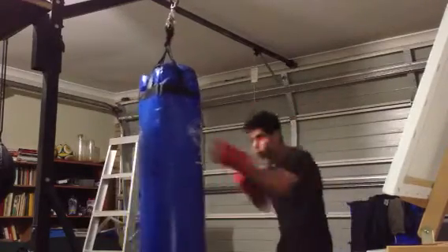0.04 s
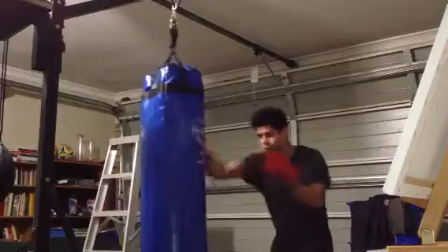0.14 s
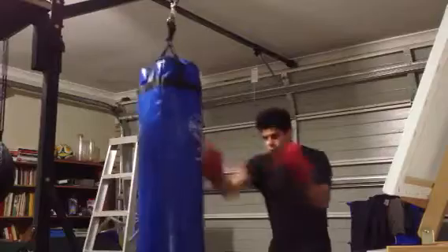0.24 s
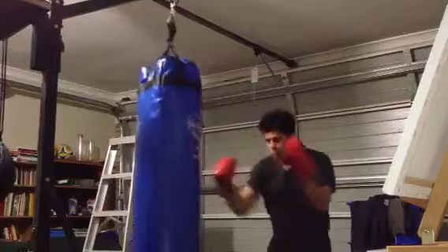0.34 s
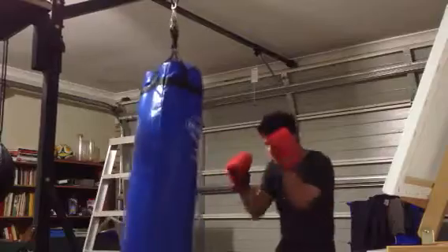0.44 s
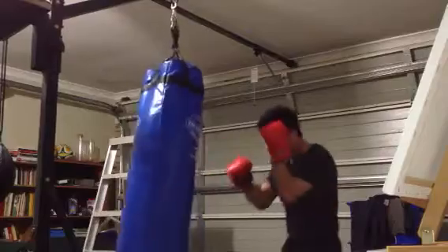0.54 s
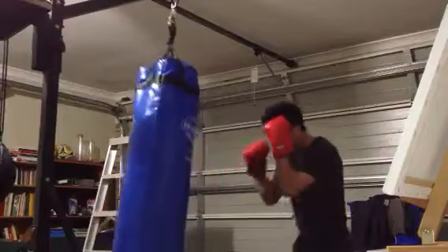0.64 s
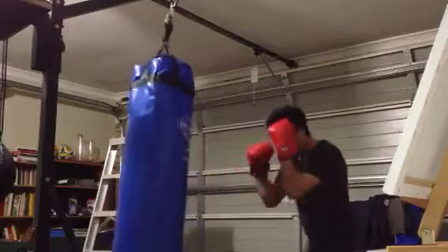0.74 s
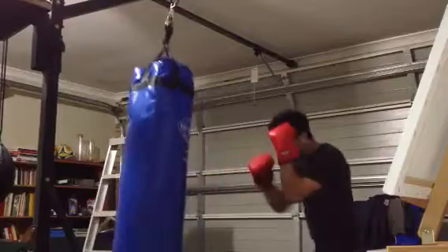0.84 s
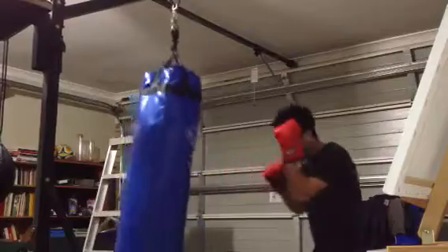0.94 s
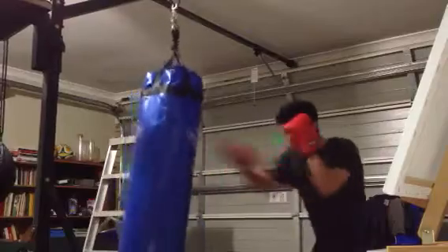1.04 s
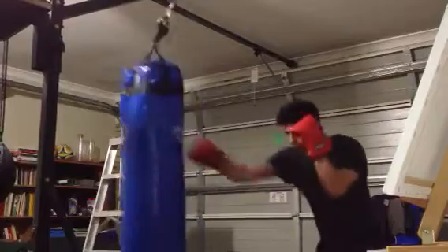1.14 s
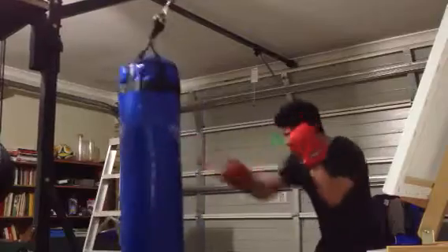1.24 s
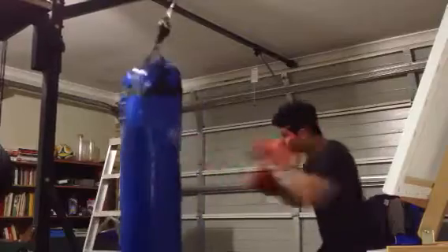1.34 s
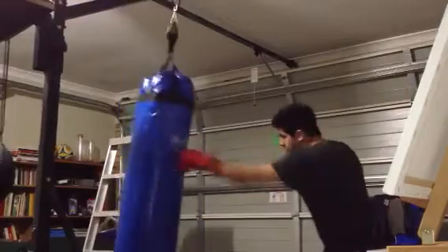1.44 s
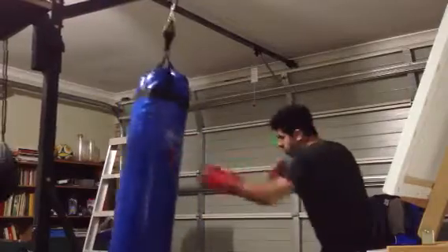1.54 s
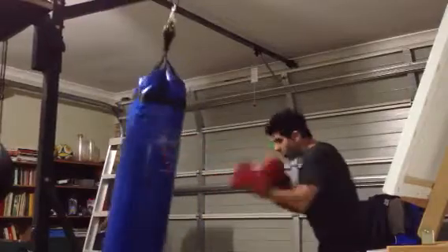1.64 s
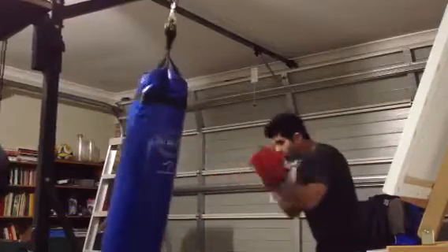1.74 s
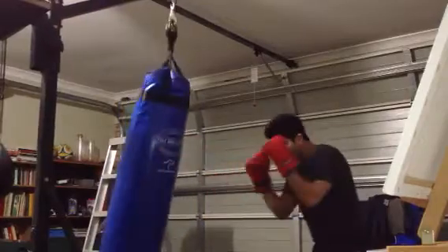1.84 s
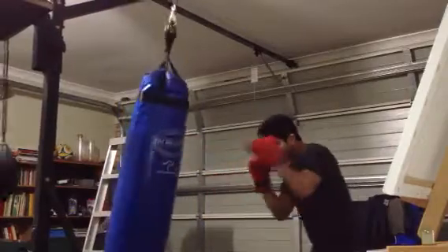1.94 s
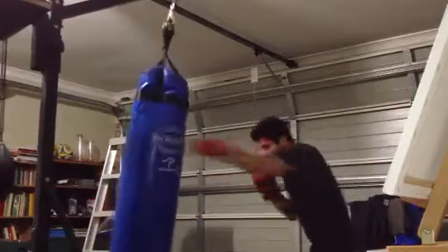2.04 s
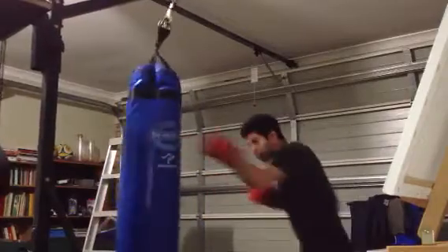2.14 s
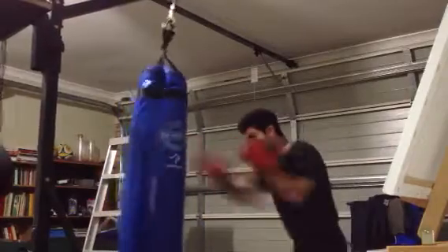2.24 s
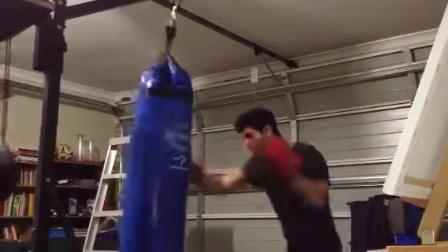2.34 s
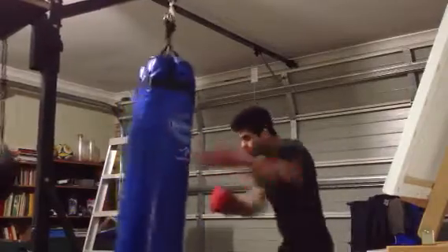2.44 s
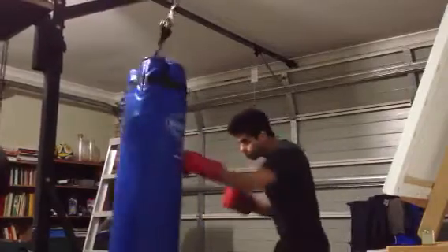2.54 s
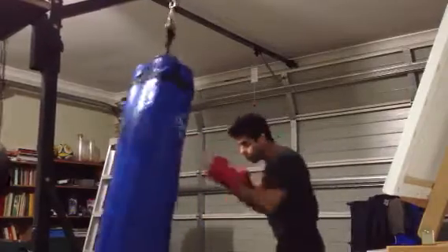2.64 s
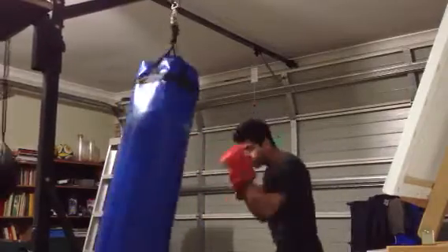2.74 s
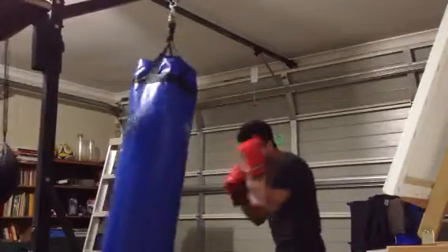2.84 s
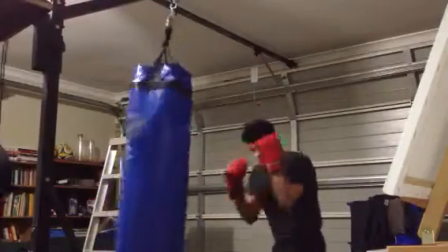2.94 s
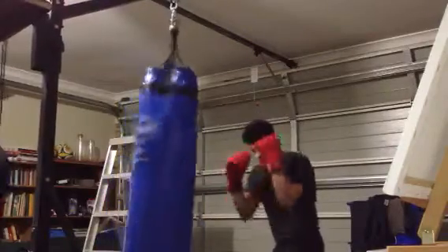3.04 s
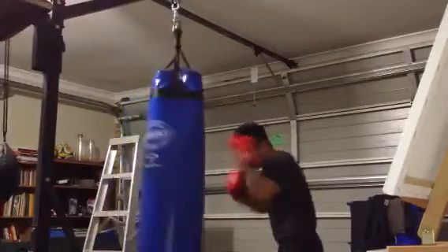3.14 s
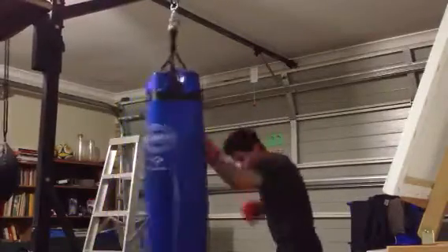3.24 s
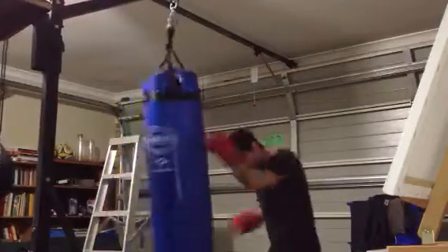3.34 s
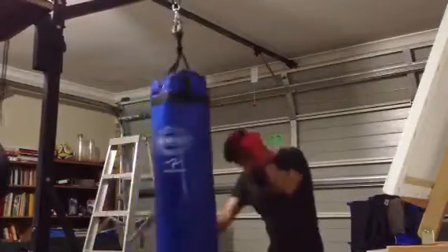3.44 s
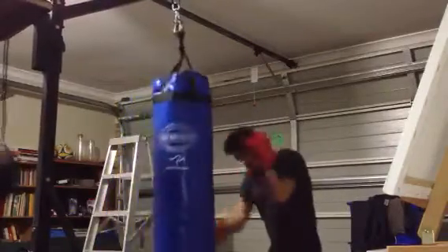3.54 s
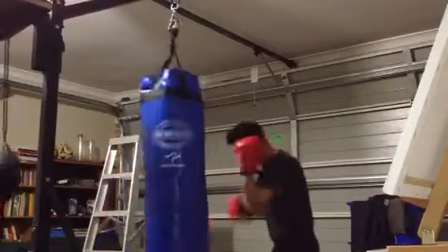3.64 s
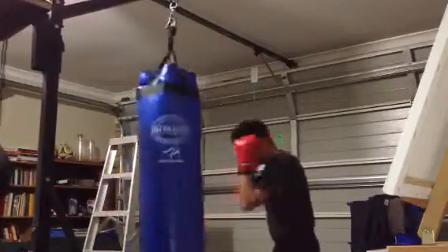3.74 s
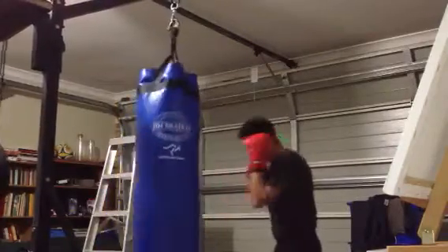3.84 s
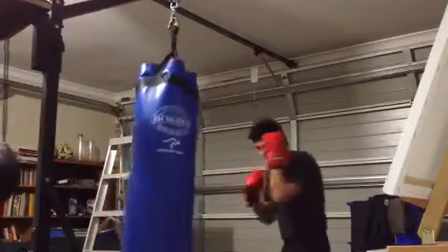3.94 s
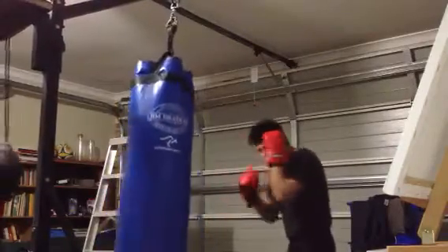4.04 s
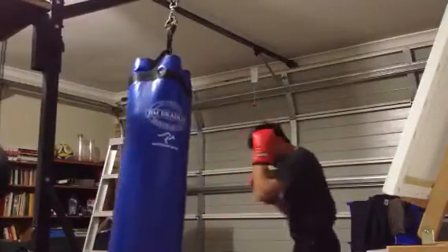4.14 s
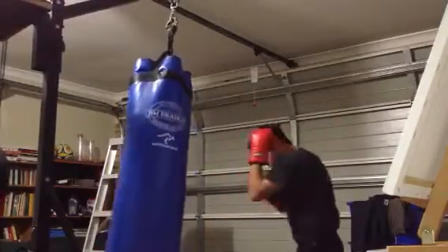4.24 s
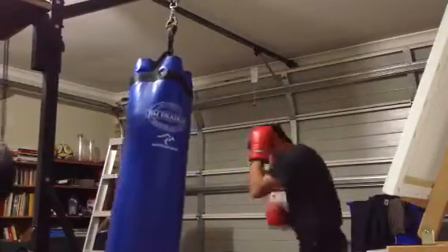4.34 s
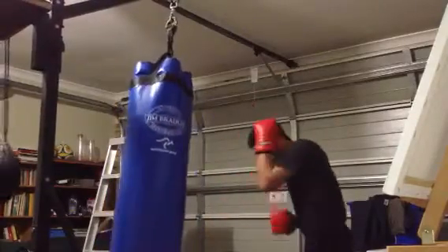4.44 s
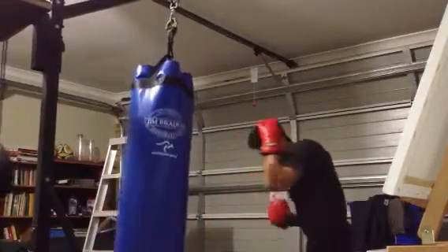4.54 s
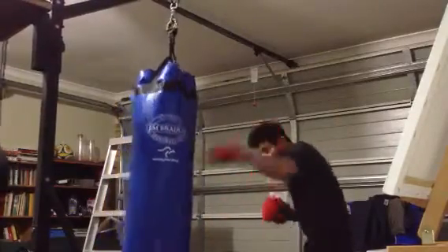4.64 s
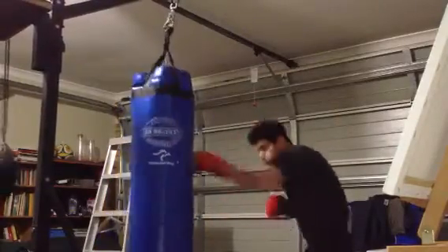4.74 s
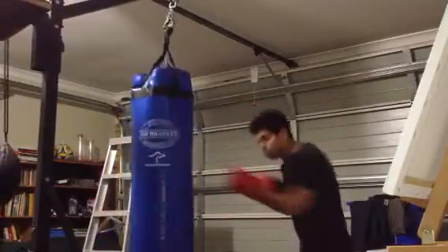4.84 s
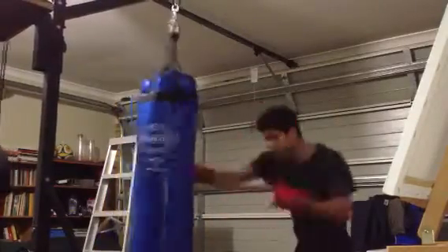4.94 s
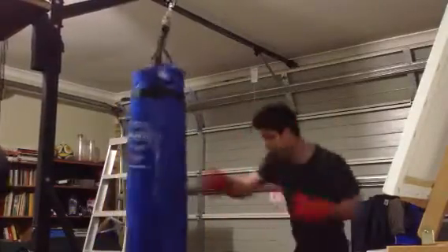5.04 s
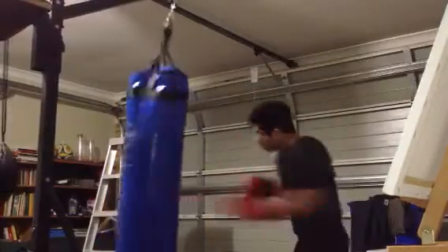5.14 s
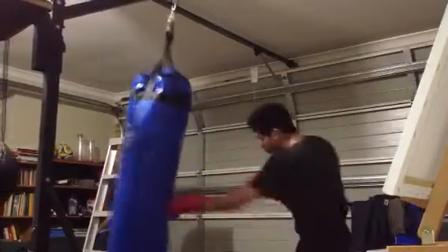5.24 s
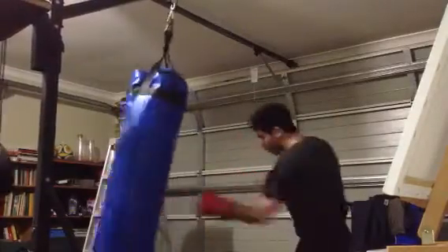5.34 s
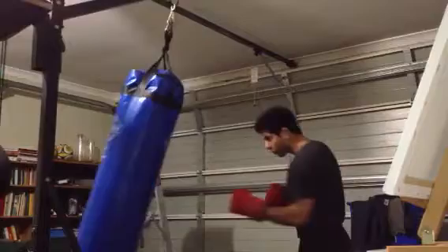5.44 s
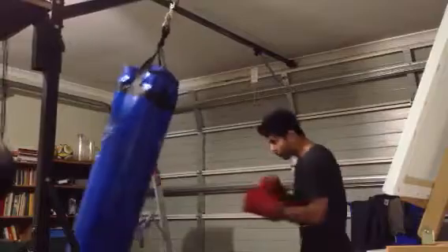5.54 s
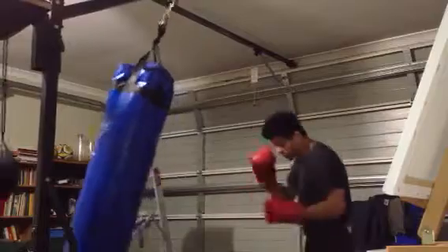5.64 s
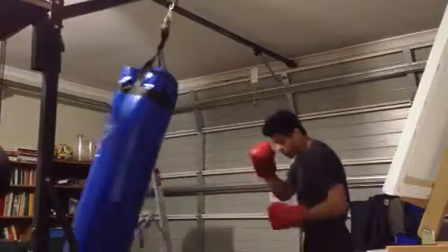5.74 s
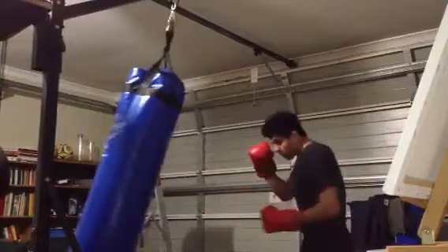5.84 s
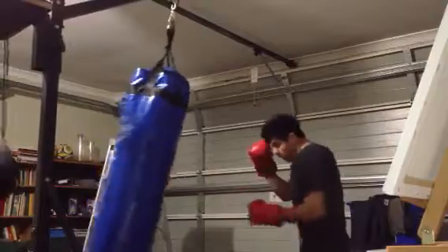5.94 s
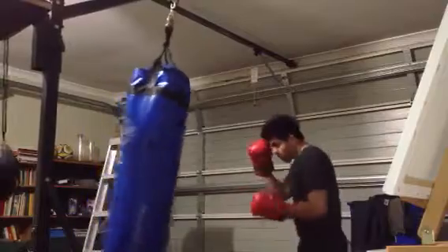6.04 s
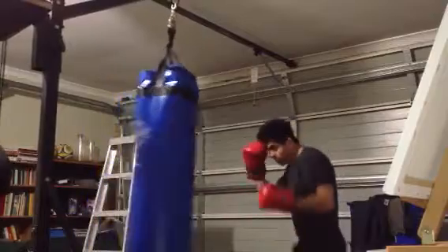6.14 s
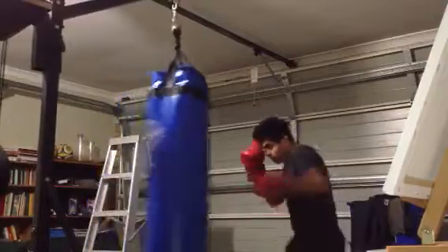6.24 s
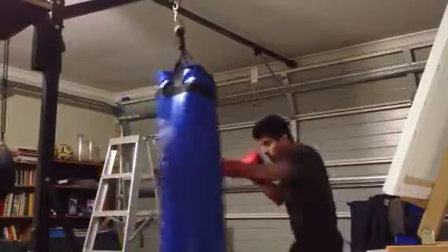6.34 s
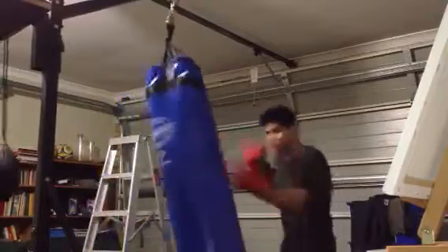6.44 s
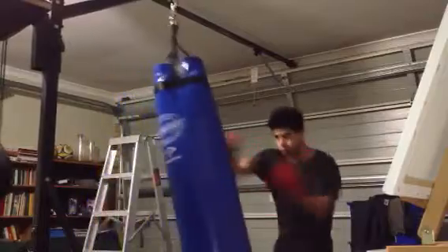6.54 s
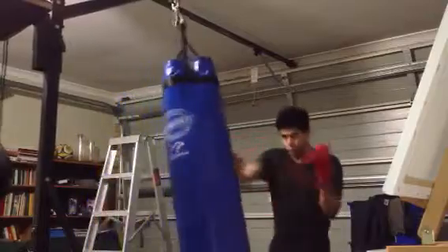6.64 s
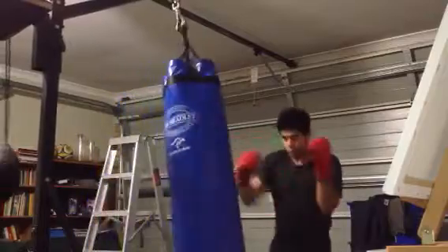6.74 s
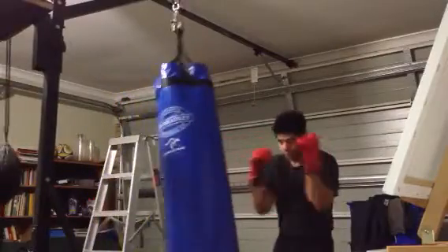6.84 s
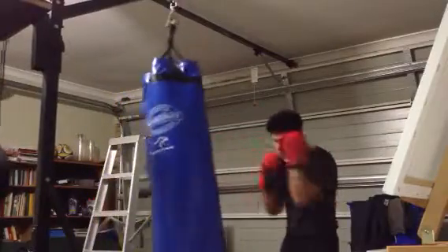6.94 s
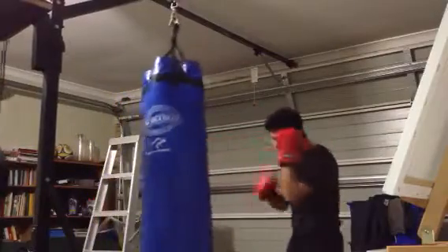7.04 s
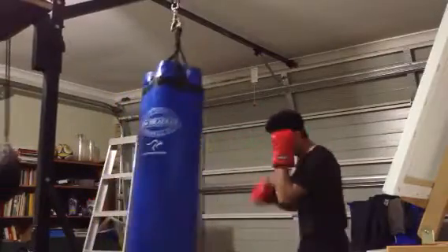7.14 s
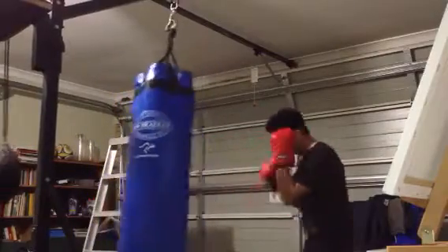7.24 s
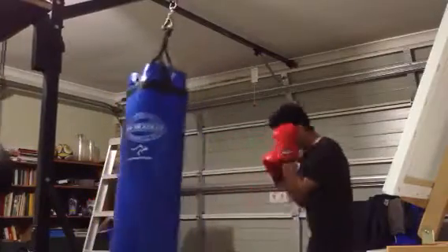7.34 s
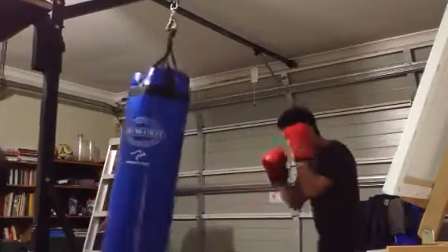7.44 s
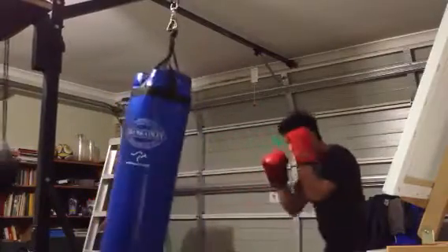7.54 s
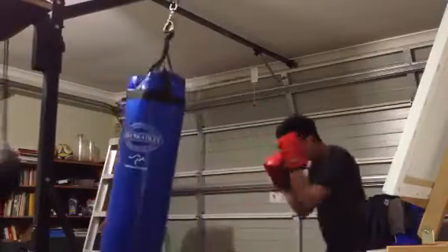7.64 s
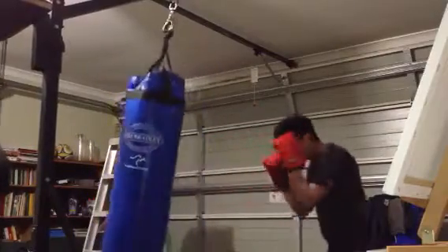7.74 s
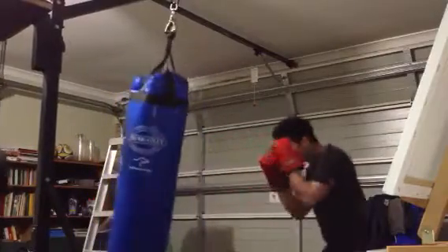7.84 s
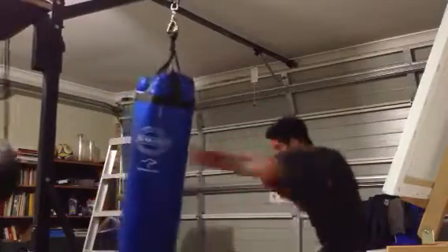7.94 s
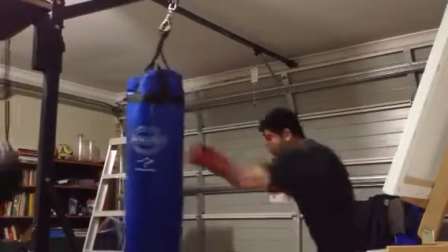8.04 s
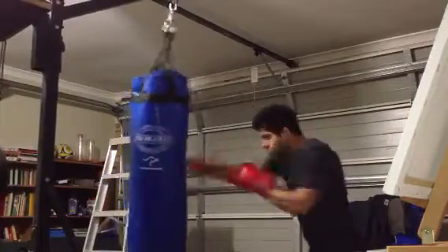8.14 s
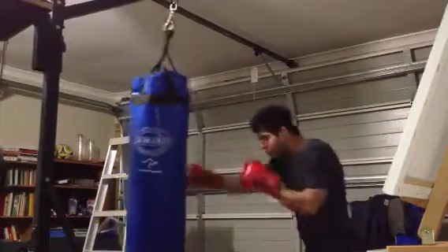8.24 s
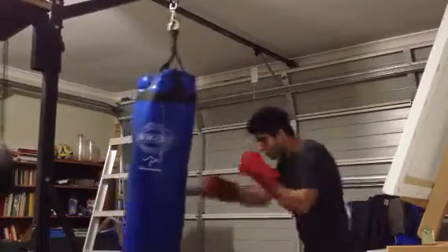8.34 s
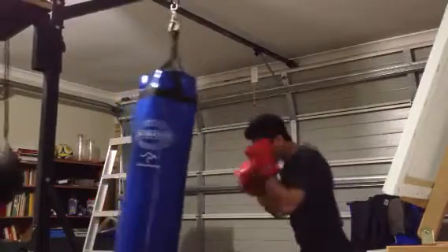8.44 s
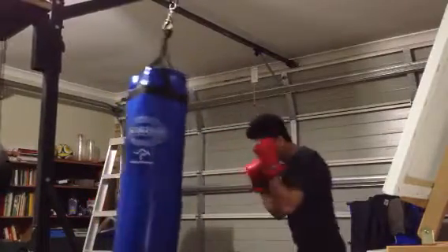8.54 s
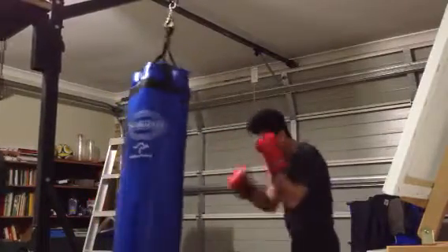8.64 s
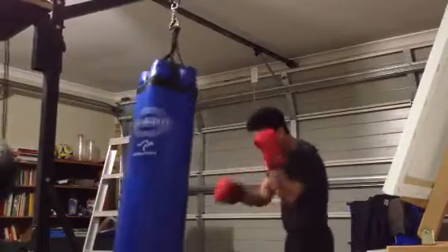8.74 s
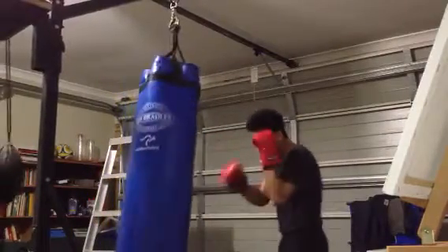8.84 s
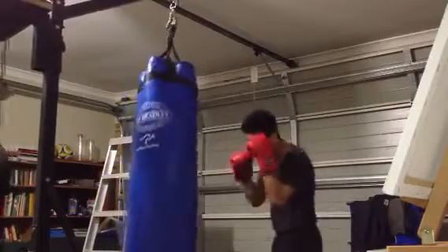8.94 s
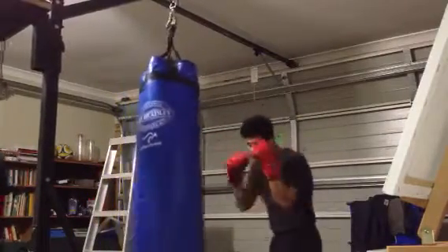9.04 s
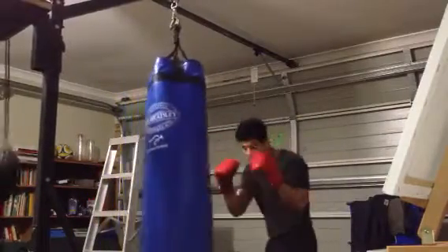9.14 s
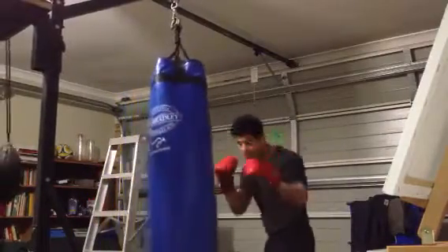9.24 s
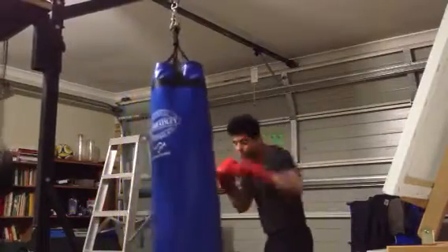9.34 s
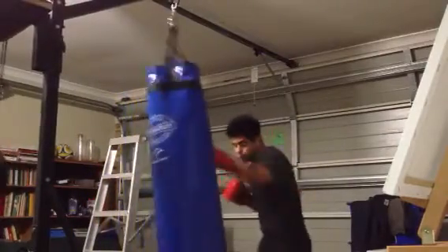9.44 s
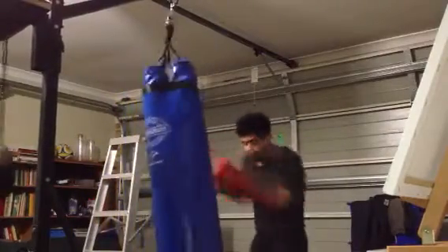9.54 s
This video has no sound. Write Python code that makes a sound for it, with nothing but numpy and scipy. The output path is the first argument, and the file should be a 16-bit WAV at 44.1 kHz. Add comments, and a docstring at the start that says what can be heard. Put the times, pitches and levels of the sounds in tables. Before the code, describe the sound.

Boxing gloves hit a hanging heavy bag in a closed garage, a few steps from the microphone. Each punch is a vinyl slap with a low thud and a slight crumple, followed by a chain rattle and a short room echo. Two punches land right at the start, two more at 1.1 and 1.5 seconds, and three between 2.1 and 2.5. The chain snaps taut in loud, bright clashes from 1.2 to 2.8 seconds, leaving a steel rail ringing faintly. A light punch and a heavy one fall near 3.4 seconds. Three more come from 4.7 to 5.3, with a loud scuff, squeak and chain clash. The hook clanks at 6.2, just before two punches. Another pair lands around 8.1 with a chain snap, and a last one at 9.5. Shoes scuff the concrete throughout, amid short, rough squeaks and faint room tone.

```python
"""Heavy bag in a closed garage

Boxing gloves hit a hanging bag in flurries, a few steps from a single microphone. Each punch is a
slap of vinyl, a low thud and a crumple of the cover; the bag jumps and its chain clashes. Shoes scuff
the concrete amid short squeaks, the hook clanks once, and the bare room and an overhead rail ring on."""
import sys
import numpy as np
from scipy import signal
from scipy.fft import rfft, irfft, next_fast_len
from scipy.io import wavfile
from scipy.ndimage import uniform_filter1d, map_coordinates

SR = 44100
rng = np.random.default_rng(int(sys.argv[2]) if len(sys.argv) > 2 else 0)


def dump(signal):
    """Clip the signal to [-1, 1] and save it as 16-bit WAV at the path in sys.argv[1]."""
    limited = np.clip(np.atleast_2d(signal).T, -1, 1)
    pcm = np.round(limited * 32767).astype(np.int16)
    wavfile.write(sys.argv[1], SR, pcm)


N = 422919
SPAN = 3 * SR // 4  # samples in one event
T = np.arange(SPAN) / SR  # time within one event (s)

# spectrum of the room tone: frequency_hz, level_db
AIR_SPECTRUM = [(15, -45), (25, -55), (69, -47), (88, -15), (128, -5.5), (243, 0.5), (278, -6.5),
                (326, -0.5), (373, -12), (2020, -20.5), (3440, -20), (5420, -21), (10300, -27.5),
                (15000, -27.5)]
# reverberation off the bare walls: frequency_hz, t60_s
GARAGE_DECAY = [(60, 0.58), (150, 0.3), (300, 0.59), (600, 0.69), (1200, 0.63), (2200, 0.57), (4500, 0.47),
                (8000, .42), (15000, 0.26)]
# standing waves of the garage: pitch_hz, level_db, t60_s
ROOM_MODES = [(98.4, 10, 0.45), (147.6, 8, 0.55), (164, -26, 0.17), (193.4, 11, 0.24), (215, 2, .2),
              (229, 4.5, .3), (286, -7, 0.34), (348, -13, 0.29)]
# shoes on concrete: start_s, scuff_db, length_s, footfall_db
FOOTSTEPS = [(0.472, -52, 0.038, -49.5), (0.649, -47, 0.079, -48), (0.903, -55, 0.34, -49),
             (3.457, -25, 0.035, -50), (4.203, -48.5, 0.026, -71), (4.306, -59, 0.27, -77),
             (4.445, -49.5, 0.065, -77), (5.067, -20.5, 0.021, -51), (5.578, -44, 0.015, -50),
             (5.748, -50, 0.083, -53), (6.046, -51, .022, -58), (7.145, -53.5, 0.2, -59),
             (7.428, -50.5, 0.072, -67), (8.009, -33.5, 0.039, -60), (8.32, -32.5, 0.022, -61),
             (8.561, -53.5, 0.039, -49.5), (8.774, -48, 0.055, -53.5), (9.051, -58, 0.023, -55),
             (9.295, -53.5, 0.082, -73), (9.456, -39, .04, -58)]
# spectrum of a sole on grit: frequency_hz, level_db
SOLE_SPECTRUM = [(60, -29.5), (300, -1.5), (500, -3), (1100, 2.5), (1700, -4), (2700, -11.5), (5000, -14.5),
                 (9000, -25), (15000, -37)]
# short, rough squeaks near 1 kHz: start_s, level_db, length_s, pitch_hz
SQUEAKS = [(0.416, -43.5, 0.046, 1114), (1.351, -32, 0.02, 1108), (1.687, -41, 0.032, 1112),
           (2.161, -40.5, 0.086, 1150), (2.637, -36.5, 0.11, 866), (2.78, -36.5, 0.03, 1113),
           (4.816, -37.5, 0.083, 947), (5.077, -23.5, 0.045, 962), (6.454, -38.5, 0.075, 1120),
           (6.926, -48.5, 0.071, 1246), (8.324, -35, 0.036, 1017)]
# the hook drops into place: start_s, level_db
HOOK_CLANKS = [(6.235, -31.5)]
# spectrum of that clank: frequency_hz, level_db
CLANK_SPECTRUM = [(60, -24), (300, -0.5), (650, -19.5), (1050, -6), (1550, -14), (2350, 1), (3000, -11.5),
                  (4800, -12.5), (5500, -27), (8500, -20.5), (11000, -39)]
# ring of the hook: pitch_hz, level_db, t60_s
HOOK_MODES = [(330, -6, 0.25), (2100, -8, 0.073), (2330, -13, .1), (2375, 3, 0.55), (2540, -19, 0.27),
              (2625, 4, 0.61), (3650, -10, 0.36), (4900, -9, 0.19)]
# ring of the steel rail that carries the bag: pitch_hz, level_db, t60_s
RAIL_MODES = [(1350, -5, 1.6), (1393, -0.5, 2.75), (1780, -2, 0.72), (2218, 5.5, 0.79), (2290, -18, 0.81),
              (4100, -9, 1.1)]
# the chain clashes as the bag drops back and snaps it taut, or a loose link ticks as it swings: start_s,
# level_db, length_s, tilt_db_per_octave
CHAIN_CLASHES = [(1.2494, -17, 0.014, -1.5), (1.7433, -14.5, 0.025, .5), (1.837, -22.5, 0.0092, -0.5),
                 (2.417, -21, .022, 0), (2.457, -17, 0.023, -0.5), (2.695, -26, 0.0091, 2.5),
                 (2.822, -15.5, .011, 1), (4.807, -39, 0.074, -0.5), (5.073, -25, 0.018, -4.5),
                 (5.098, -18.5, 0.027, .5), (5.568, -43.5, 0.02, -2.5), (5.854, -54.5, 0.0079, 2),
                 (6.52, -38, 0.0017, -7.5), (6.574, -36, 0.034, -5), (6.984, -52, 0.0034, -2),
                 (7.207, -49, 0.0031, 4.5), (8.105, -21.5, 0.016, 2.5)]
# spectrum of link striking link: frequency_hz, level_db
STEEL_SPECTRUM = [(30, -59), (250, -14), (500, -15.5), (900, -9.5), (1500, -7), (2700, -6.5), (4200, -1.5),
                  (6000, -5.5), (8000, -6), (11000, -10.5), (15000, -13.5)]
# ring of the links: pitch_hz, level_db, t60_s
LINK_MODES = [(2870, 11, 0.064), (3240, -6, .09), (3780, 2, 0.31), (4070, 1.5, 0.48), (4410, 3, 0.09),
              (4450, -8, 0.27), (4910, 7.5, 0.091), (5240, 18, 0.056), (7200, 10.5, 0.03), (7894, -3, .08)]
# glove on bag: start_s, thud_db, thud_hz, slap_db, chain_jerk_db
GLOVE_HITS = [(0.001, -31, 169, -34.5, -36), (0.2, -25.5, 215, -30.5, -38), (1.1269, -25.5, 183, -27, -47),
              (1.4503, -27, 183, -23, -26), (2.102, -32.5, 183, -31, -40.5), (2.3249, -24.5, 193, -27, -16),
              (2.519, -25.5, 190, -28, -35), (3.278, -34.5, 213, -43, -49), (3.458, -18, 207, -24.5, -29),
              (4.738, -31, 193, -33, -42), (4.973, -19.5, 206, -24, -23.5),
              (5.2525, -24.5, 196, -22, -24.5), (6.367, -38, 212, -36, -58), (6.599, -28, 177, -28, -21),
              (8.0116, -43, 207, -27, -59), (8.2085, -24, 195, -25.5, -31), (9.455, -26.5, 182, -31, -35.5)]
# spectrum of a soft, heavy impact: frequency_hz, level_db
THUD_SPECTRUM = [(25, -33), (55, -56), (85, -12), (140, -2), (200, 5), (300, 6), (500, 4), (900, -39.5),
                 (3000, -43)]
# spectrum of a glove on vinyl: frequency_hz, level_db
SLAP_SPECTRUM = [(40, -16.5), (200, 17), (500, -2.5), (1100, 3), (2000, -3.5), (3000, -7), (5000, -3.5),
                 (7000, -7), (10000, -10.5), (15000, -14)]
# spectrum of the crumpling cover: frequency_hz, level_db
COVER_SPECTRUM = [(60, -25.5), (300, 7), (500, -4), (900, 1), (1600, -4), (2600, -9.5), (4300, -10),
                  (6500, -12), (10000, -16.5), (15000, -15.5)]

SHUFFLE_DB, TREAD_DB, SHUFFLE_SPREAD_DB, SHUFFLE_S = -60, -64, 2, 0.17  # light footwork between steps
SQUEAK_ROUGH, ROUGHER_PER_S = 0.034, 7.04  # roughness 0-1: a short squeak sings, a long one grates
JINGLE_DB, JINGLE_SPREAD_DB, JINGLE_S = -64, 2, 0.027  # loose links tick while the bag swings
LINK_LAG_S = 0.001  # a jolt runs down the chain, link after link
JERK_AFTER_S, JERK_S = 0.028, 0.023  # a blow reaches the chain this much later and rattles it this long
ROUND_TRIP_S, WALL_DB = 0.0207, -7.5  # a thud bounces between facing walls; level change per trip
FIRM_SLAP_DB = -25.5  # a firm punch; harder ones are brighter and dent the cover more
FIRM_TILT, TILT_PER_DB = 0.6, 0.12  # dB per octave at a firm punch; its rise per dB of slap
CRUMPLE_DB, CRUMPLE_PER_DB = -30.5, 0.57  # level at a firm punch; its rise per dB of slap


def amp(db):
    """Decibels to gain."""
    return 10 ** (np.asarray(db) / 20)


def along(points, hz):
    """(frequency_hz, value) points read on a log axis."""
    frequencies, values = np.transpose(points)
    return np.interp(np.log(hz + 1), np.log(frequencies), values)


def unit(x):
    """x scaled to energy 1."""
    return x / np.sqrt(np.sum(x ** 2) + 1e-20)


def through(x, response):
    """x convolved with an impulse response."""
    return signal.fftconvolve(x, response)[:SPAN]


def delayed(x, lag_s):
    """x, arriving later."""
    return np.pad(x, (max(round(lag_s * SR), 0), 0))[:SPAN]


def colour(spectrum, tilt=0):
    """Minimum-phase impulse response of a spectrum, tilted above 400 Hz in dB per octave."""
    size = 4096
    hz = np.fft.rfftfreq(size, 1 / SR)
    level_db = along(spectrum, hz) + tilt * np.log2(np.maximum(hz, 400))
    cepstrum = irfft(np.log(amp(level_db)))
    cepstrum[1:size // 2] *= 2
    cepstrum[size // 2 + 1:] = 0
    return unit(irfft(np.exp(rfft(cepstrum))))


def fade(t60_s):
    """Exponential decay, 60 dB down after t60_s."""
    return np.exp(-np.log(1000) * T / np.maximum(t60_s, 1e-4))


def swell(length_s, rise_s):
    """An envelope that builds up, holds for its length and stops."""
    return (1 - np.exp(-T / rise_s)) * np.exp(-(T / length_s) ** 4)


def wobble(knots_per_s):
    """A random curve that glides from knot to knot."""
    return map_coordinates(rng.standard_normal(SPAN // 10), [T * knots_per_s], order=1)


def now_and_then(count):
    """Loosely spaced moments across the scene: rows of (start_s, standard normal deviate)."""
    starts_s = (np.arange(count) + rng.random(count)) / count * N / SR
    return zip(starts_s, rng.standard_normal(count))


def ring(modes):
    """Damped modes, struck at slightly new strengths each time."""
    return unit(sum(amp(db + 2 * rng.standard_normal()) * fade(t60_s) * np.sin(2 * np.pi * hz * T)
                    for hz, db, t60_s in modes))


def contacts(length_s, rise_s, per_s):
    """A burst of tiny contacts of uneven size."""
    touching = rng.random(SPAN) < per_s / SR
    sizes = np.sign(rng.standard_normal(SPAN)) * amp(2 * rng.standard_normal(SPAN))
    return unit(touching * sizes * swell(length_s, rise_s))


def add(track, start_s, level_db, x):
    """Mix in an event whose loudest 25 ms have the given level."""
    loudest = np.sqrt(uniform_filter1d(x * x, size=SR // 40, mode="constant").max())
    start = max(round(start_s * SR), 0)
    track[start:start + SPAN] += (amp(level_db) / loudest * x)[:N - start]


def room_tone():
    """The faint steady rush of the closed room, all round the microphone."""
    spectrum = amp(along(AIR_SPECTRUM, np.fft.rfftfreq(N, 1 / SR)))
    rush = irfft(rfft(rng.standard_normal(N)) * spectrum, N)
    return amp(-58) * rush / rush.std()


def garage(x, direct_db):
    """The direct path to the microphone plus a dense tail off bare walls, new for each position."""
    hz, t, noise = signal.stft(rng.standard_normal(SPAN), SR, nperseg=256)
    decay = amp(-60 * t / along(GARAGE_DECAY, hz)[:, None])
    tail = signal.istft(noise * decay, SR, nperseg=256)[1][:SPAN]
    build_up = 1 - fade(0.0016)
    return amp(direct_db) * x + through(x, unit(tail * build_up))


def thud(hz):
    """A soft mass rebounds for a few cycles, echoes between the walls and sets off standing waves."""
    rebound = -np.sin(2 * np.pi * hz * T) * fade(0.031)
    push = unit(through(rebound, colour(THUD_SPECTRUM)))
    echoes = sum(amp(WALL_DB * trip) * delayed(push, ROUND_TRIP_S * trip) for trip in (1, 2))
    standing_waves = unit(through(push, ring(ROOM_MODES)))
    return garage(push, direct_db=-0.5) + amp(4.5) * echoes + amp(-1) * standing_waves


def feet():
    """Down on the floor, soles land softly and drag over gritty concrete, shuffling between steps."""
    track = np.zeros(N)
    shuffles = []
    for start_s, deviate in now_and_then(count=22):
        weight_db = SHUFFLE_SPREAD_DB * deviate
        shuffles.append((start_s, SHUFFLE_DB + weight_db, SHUFFLE_S, TREAD_DB + weight_db))
    for start_s, scuff_db, length_s, footfall_db in FOOTSTEPS + shuffles:
        grit = contacts(length_s, rise_s=0.05 * length_s, per_s=4000)
        scuff = through(grit, colour(SOLE_SPECTRUM))
        add(track, start_s, scuff_db, garage(scuff, direct_db=-0.5))
        add(track, start_s, footfall_db, thud(hz=246))
    return track


def squeaks():
    """Short, rough squeaks of unsteady pitch near 1 kHz, perhaps shoes pivoting on concrete."""
    track = np.zeros(N)
    for start_s, level_db, length_s, pitch_hz in SQUEAKS:
        rough = np.clip(SQUEAK_ROUGH + ROUGHER_PER_S * length_s, 0, 1)
        wavering_hz = pitch_hz * (1 + 0.308 * rough * wobble(knots_per_s=600))
        phase = 2 * np.pi * np.cumsum(wavering_hz) / SR
        tone = np.sin(phase) + 0.15 * np.sin(2 * phase) + 0.15 * np.sin(3 * phase)
        flutter = amp(5 * rough * wobble(knots_per_s=400))
        squeak = tone * flutter * swell(length_s, rise_s=0.004)
        add(track, start_s, level_db, garage(squeak, direct_db=4.5))
    return track


def hook():
    """Above the bag, the steel hook drops into place with a clank and rings."""
    track = np.zeros(N)
    for start_s, level_db in HOOK_CLANKS:
        clank = through(contacts(length_s=0.0079, rise_s=0.004, per_s=2200), colour(CLANK_SPECTRUM))
        add(track, start_s, level_db, garage(clank, direct_db=-1) + amp(-1) * ring(HOOK_MODES))
    return track


def rail(jolts):
    """Overhead, jolts of the chain leave the steel rail ringing faintly."""
    return amp(-27.5) * signal.fftconvolve(jolts, ring(RAIL_MODES))[:N]


def clash(length_s, tilt):
    """Links collide in a quick burst, each from its own spot: bright clicks with a little ring."""
    steel, link_ring = colour(STEEL_SPECTRUM, tilt), ring(LINK_MODES)
    burst = np.zeros(SPAN)
    for link in range(4):
        knocks = contacts(length_s, rise_s=0.00021, per_s=1800)
        clicks = through(delayed(knocks, link * LINK_LAG_S), steel)
        ringing = amp(-14) * unit(through(clicks, link_ring))
        burst += garage(unit(clicks) + ringing, direct_db=-4)
    return burst


def chain():
    """The chain rattles just after each punch, snaps taut as the bag drops, and ticks as it swings."""
    track = np.zeros(N)
    for start_s, _, _, _, jerk_db in GLOVE_HITS:
        add(track, start_s + JERK_AFTER_S, jerk_db, clash(JERK_S, tilt=0.33))
    for start_s, level_db, length_s, tilt in CHAIN_CLASHES:
        add(track, start_s, level_db, clash(length_s, tilt))
    for start_s, deviate in now_and_then(count=24):
        add(track, start_s, JINGLE_DB + JINGLE_SPREAD_DB * deviate, clash(JINGLE_S, tilt=-0.6))
    return track


def punches():
    """Up front, the glove smacks the vinyl, the filling thuds and the cover crumples round the dent."""
    track = np.zeros(N)
    for start_s, thud_db, thud_hz, slap_db, _ in GLOVE_HITS:
        harder_db = slap_db - FIRM_SLAP_DB
        tilt = FIRM_TILT + TILT_PER_DB * harder_db
        smack = unit(np.sign(rng.standard_normal(SPAN)) * fade(0.014))
        smack[0] -= 0.23  # a sharp click at first contact
        smack += 0.22 * delayed(smack, 0.004)  # a surface close by throws it back
        slap = through(smack, colour(SLAP_SPECTRUM, tilt))
        snap_db = -0.3 + 0.93 * harder_db  # a hard, flat hit cracks out of the room's wash
        add(track, start_s, slap_db, garage(slap, direct_db=snap_db))
        add(track, start_s, thud_db, thud(thud_hz))
        creases = contacts(length_s=0.06, rise_s=0.00065, per_s=4000)
        crumple = through(creases, colour(COVER_SPECTRUM, tilt))
        crumple_db = CRUMPLE_DB + CRUMPLE_PER_DB * harder_db
        add(track, start_s + 0.008, crumple_db, garage(crumple, direct_db=-3.5))
    return track


def scene():
    """The whole garage as it reaches the one microphone."""
    jolts = chain()
    return (punches() + jolts + rail(jolts) + squeaks() + hook() + feet() + room_tone())[None]


def record(dry):
    """The recorder rounds off the highest peaks and keeps nothing above its band limit."""
    ceiling, top_hz = 0.55, 15350
    rounded = dry / (1 + (dry / ceiling) ** 4) ** 0.25
    size = next_fast_len(N + SPAN)
    in_band = np.fft.rfftfreq(size, 1 / SR) < top_hz
    return irfft(rfft(rounded, size) * in_band, size)[:, :N]


dry = scene()
out = record(dry)
dump(out)
```